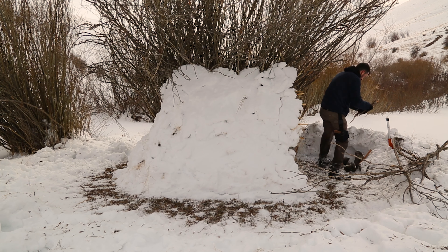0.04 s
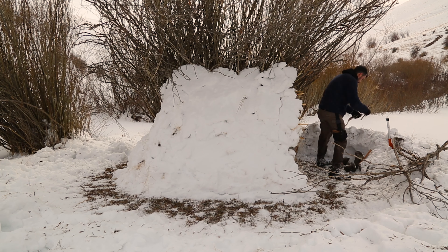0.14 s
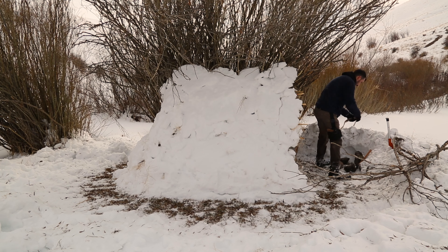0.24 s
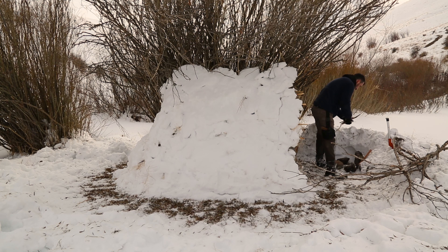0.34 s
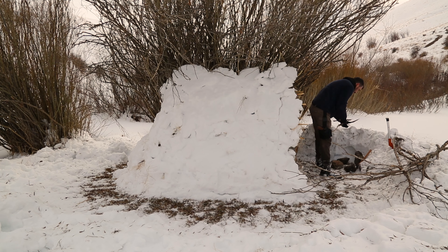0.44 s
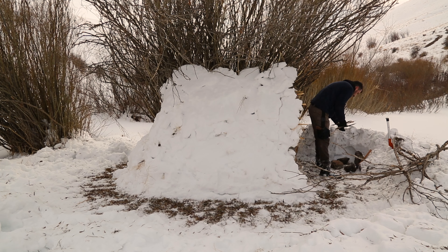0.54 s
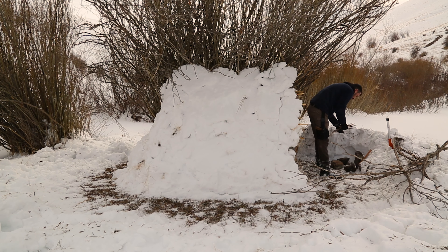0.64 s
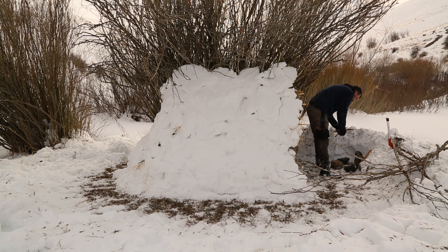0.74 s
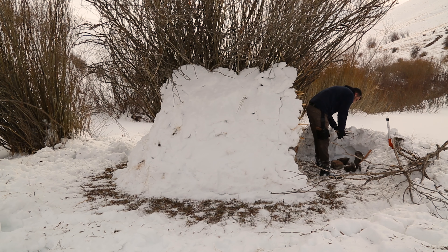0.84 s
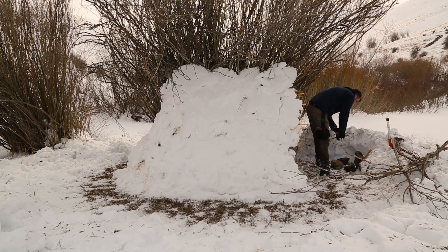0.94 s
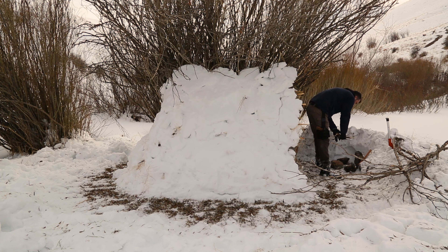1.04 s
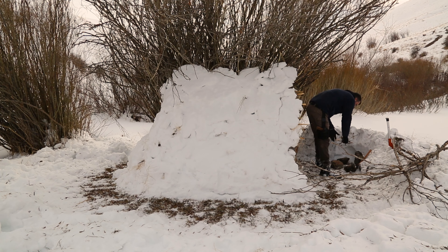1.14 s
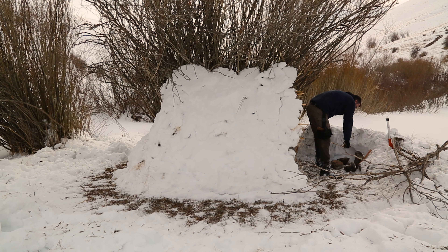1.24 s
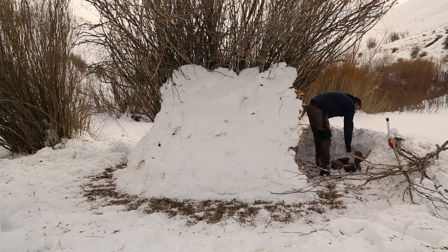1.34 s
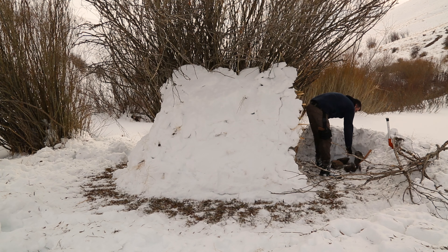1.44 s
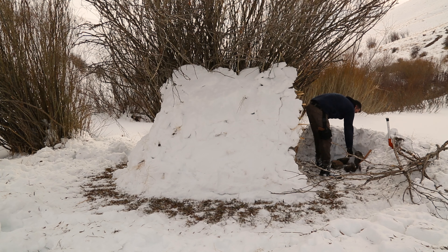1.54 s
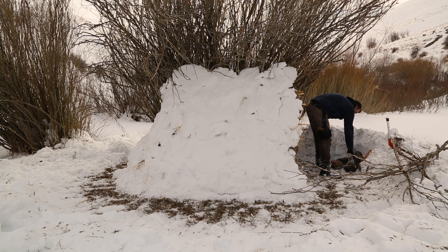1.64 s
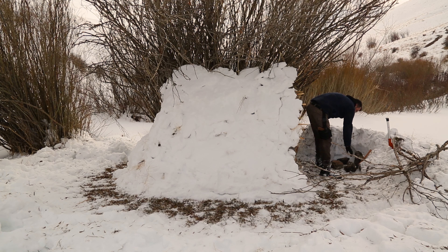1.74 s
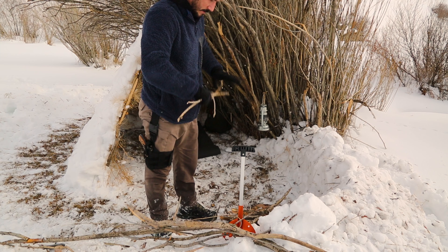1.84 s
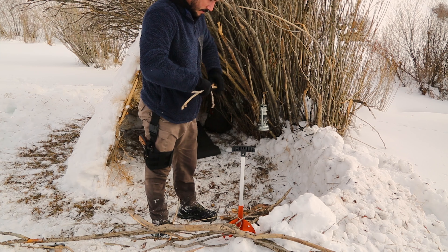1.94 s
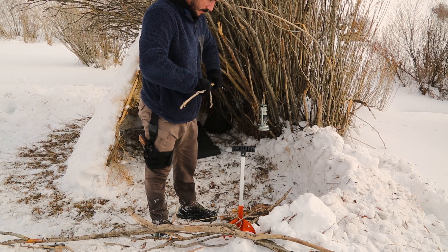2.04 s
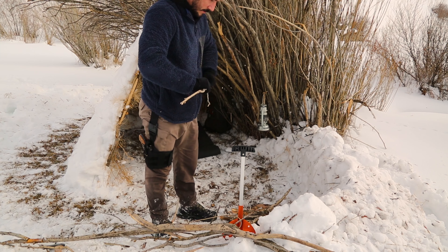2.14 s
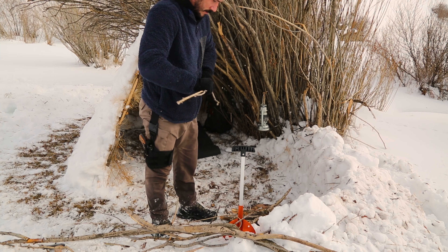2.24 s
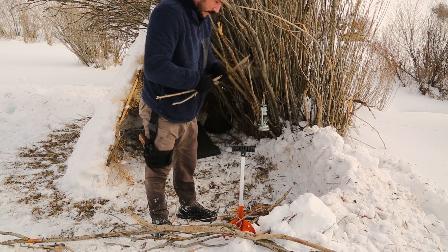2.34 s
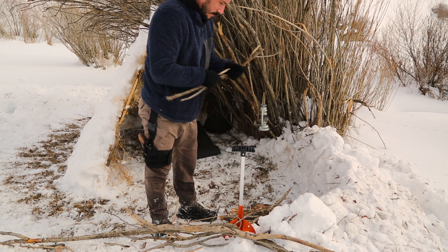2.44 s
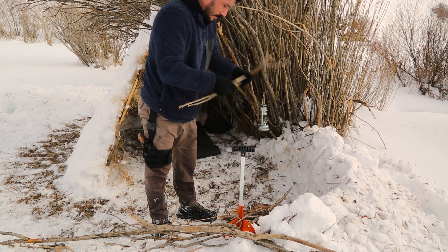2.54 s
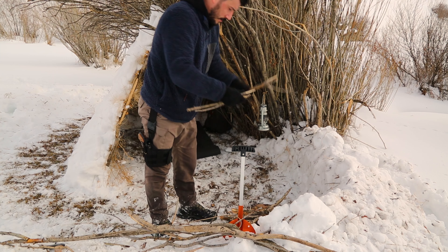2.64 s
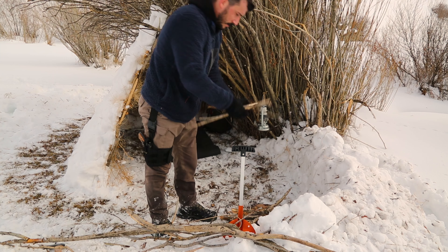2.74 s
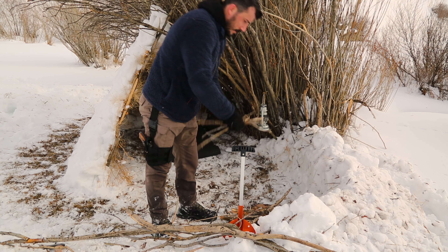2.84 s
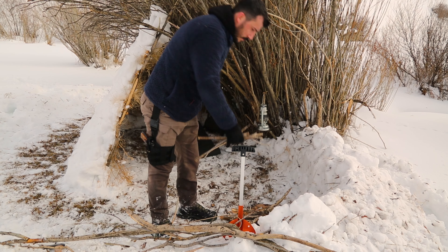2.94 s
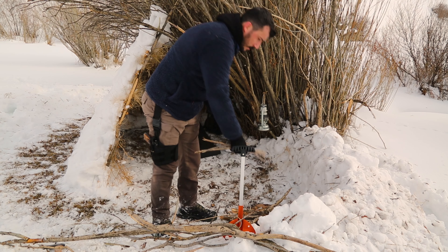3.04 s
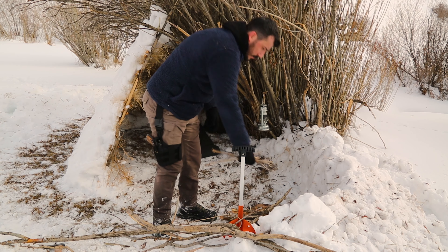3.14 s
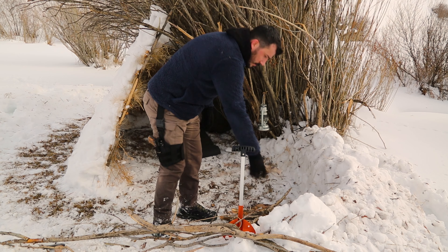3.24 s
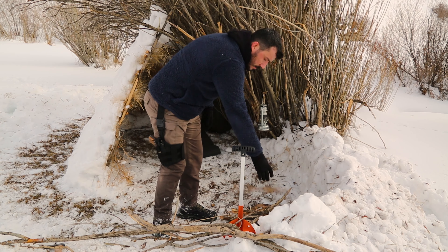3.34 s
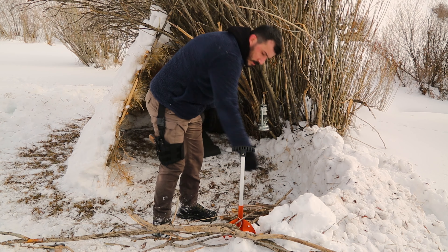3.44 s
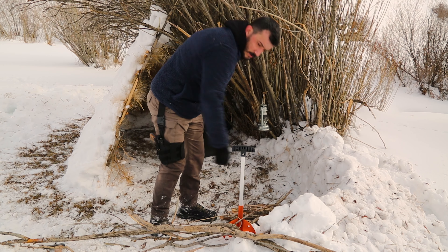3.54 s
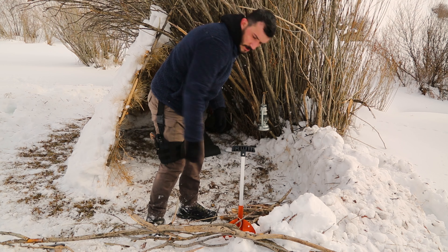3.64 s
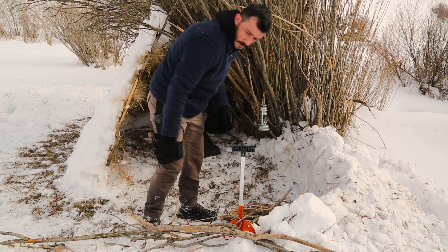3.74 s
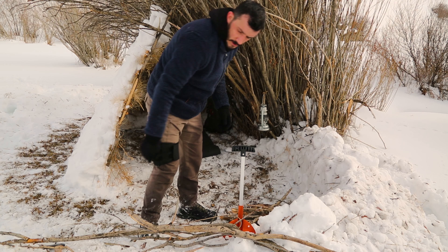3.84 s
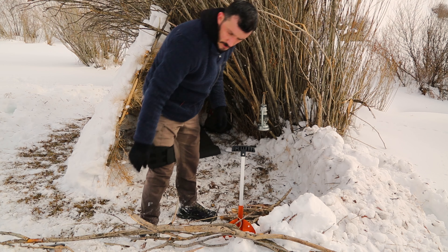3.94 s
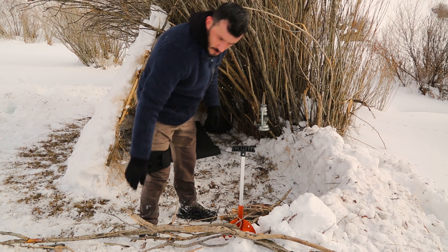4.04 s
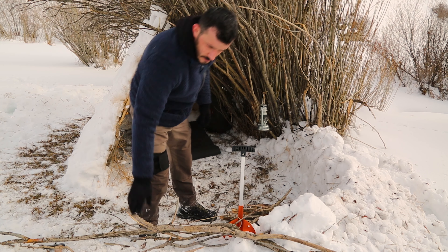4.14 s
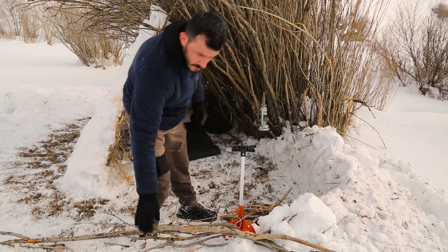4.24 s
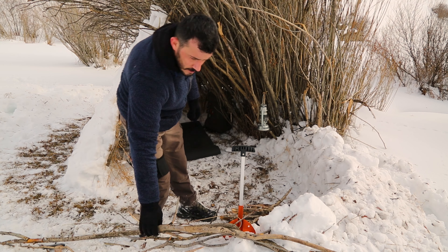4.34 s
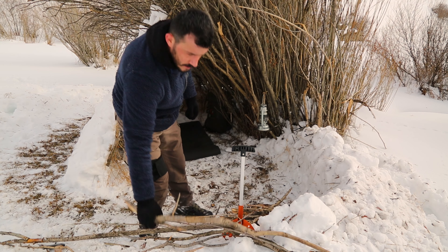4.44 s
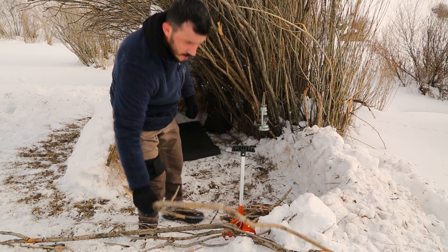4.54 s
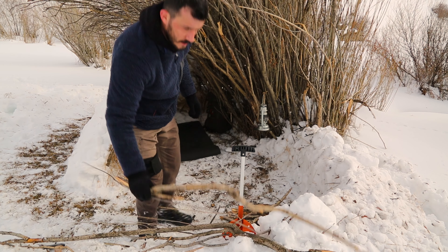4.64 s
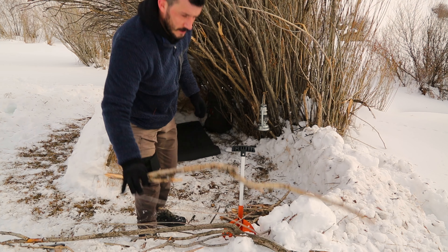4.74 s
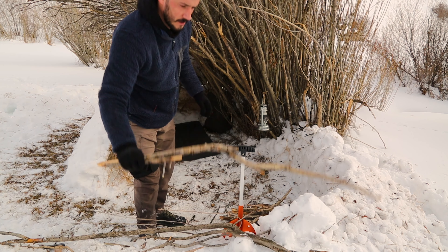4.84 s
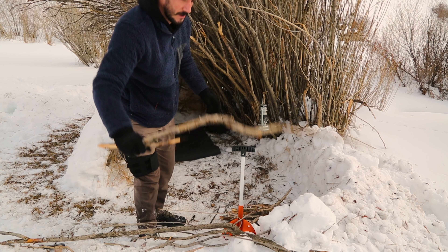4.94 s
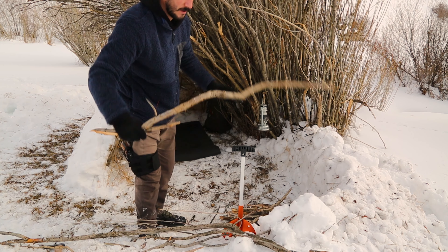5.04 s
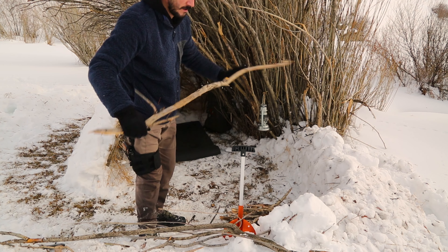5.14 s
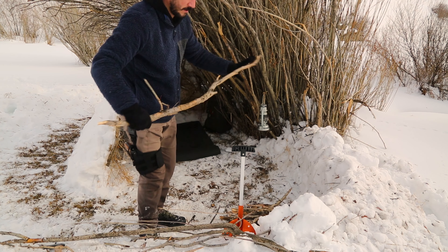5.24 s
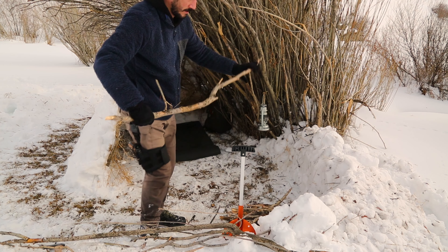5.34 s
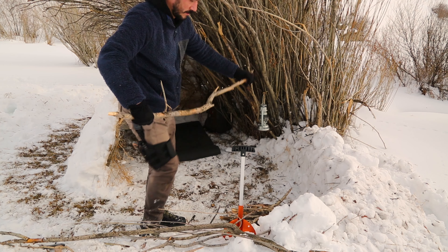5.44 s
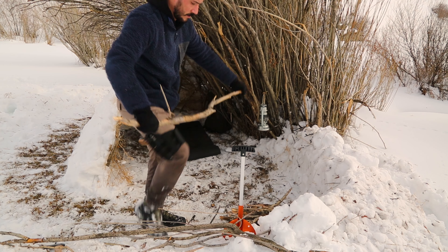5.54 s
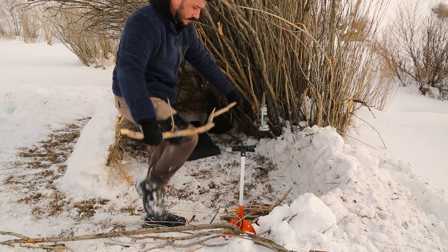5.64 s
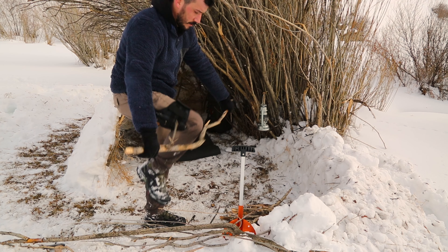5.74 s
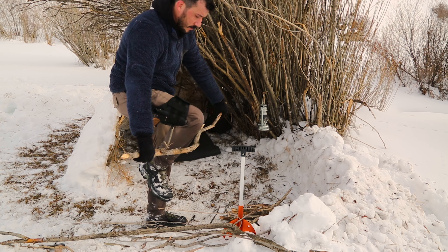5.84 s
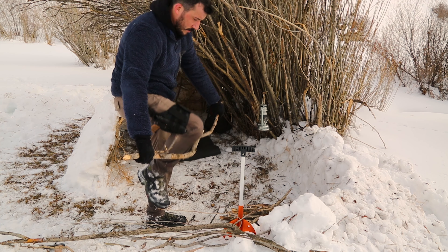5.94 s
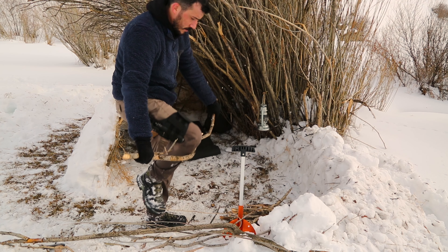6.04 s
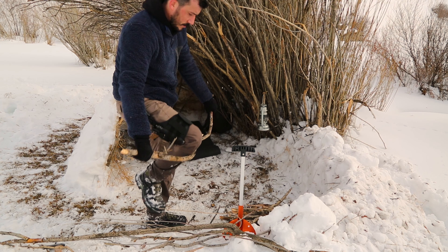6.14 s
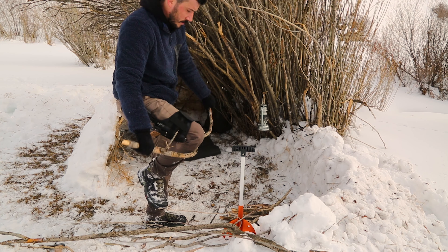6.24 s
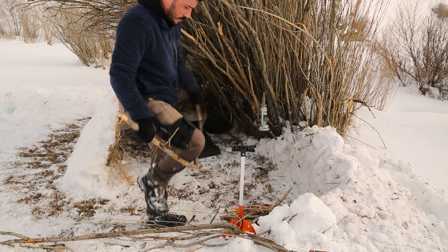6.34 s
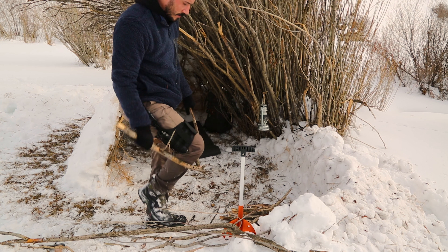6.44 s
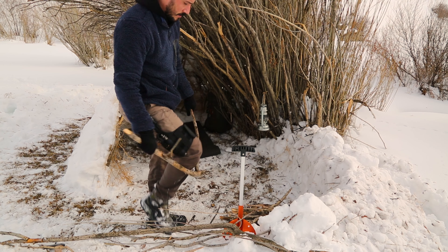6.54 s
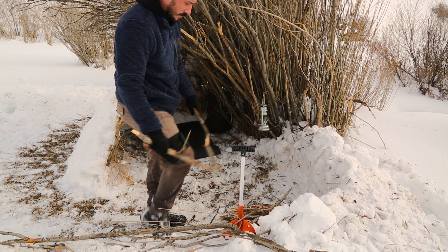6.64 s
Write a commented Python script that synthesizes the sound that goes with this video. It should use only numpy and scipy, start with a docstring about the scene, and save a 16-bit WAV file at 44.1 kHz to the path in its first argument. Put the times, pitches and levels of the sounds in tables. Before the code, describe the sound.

Dry sticks tick, knock and snap sharply in a quiet snowy camp, with faint rustling and one overloading crack near the end.

```python
"""Snapping sticks in a snowy camp

Dry sticks are picked up, knocked together and snapped in a quiet snowy camp.
Each crack is a burst of tiny clicks, the breaking fibres, filtered by the ringing stick.
Grains of noise make the rustle of twigs, snow and cloth between the cracks.
Behind them are a faint outdoor hush, a far hum, one soft whistle and a thin high tone;
the biggest snap overloads the recorder.
"""
import sys
import numpy as np
from scipy import signal
from scipy.fft import rfft, irfft
from scipy.io import wavfile
from scipy.ndimage import uniform_filter1d

SR = 44100
rng = np.random.default_rng(int(sys.argv[2]) if len(sys.argv) > 2 else 0)


def store_wav(level_fs):
    """Save 16-bit WAV to argv[1]."""
    pcm = np.round(np.clip(np.atleast_2d(level_fs), -1, 1) * 32767)
    wavfile.write(sys.argv[1], SR, pcm.T.astype(np.int16))


N = 295029  # length of the scene in samples

# Colour of the open air and microphone hiss.
# Each row: pitch in Hz, relative level in dB per Hz.
HUSH_COLOUR = [(18, -74), (30, -49), (116, -26), (200, -11), (240, -16), (304, -8), (374, -7), (538, -8),
               (698, -9.5), (881, -10), (1690, -13), (2250, -16), (15000, -24.5)]

# Moves that rub twigs, cloth and snow.
# Each row: loudest moment in seconds, length in seconds, level in dB, treble slope in dB per octave.
RUB_MOVES = [(0.0, 0.19, -61, 0), (0.479, 0.19, -57, -13), (0.89, 0.11, -63, -10),
             (1.84, 0.16, -61.5, -5.5), (2.06, 0.19, -64, -8), (2.938, 0.12, -70, -13),
             (3.559, 0.11, -58.5, -8), (3.847, 0.31, -65.5, -6), (4.061, 0.22, -63, -3.5),
             (4.33, .12, -68, -11), (4.56, 0.29, -61.5, -7), (4.71, 0.096, -59.5, -9),
             (4.805, 0.06, -51, -10), (5.059, 0.11, -63, -5), (5.196, 0.1, -60.5, -11),
             (5.502, 0.66, -65.5, -9.5), (5.946, .08, -55.5, -7), (6.002, 0.047, -54.5, -12),
             (6.141, 0.095, -51, -6.5), (6.196, 0.056, -46, -1), (6.328, 0.1, -54.5, 0.5),
             (6.69, 0.11, -52.5, -6)]

# Cracks and ticks of wood.
# Each row: start in seconds, approximate peak in dB, ring pitch in Hz, treble slope in dB per octave,
# tearing time in ms, ring strength in dB.
CRACKS = [(0.02, -40.5, 6800, -21, 4.6, 0), (0.1065, -49, 5340, -3, 3.7, 2),
          (0.832, -41.5, 1950, -3, 2.4, 1), (0.8749, -38.5, 6170, -23, 3.7, 3),
          (1.2251, -32.5, 1490, -4, 2.2, -15), (1.775, -39.5, 2100, -10.5, 2.7, -2.5),
          (1.823, -42, 1320, -5.5, 2.2, -1), (1.8528, -41.5, 1450, -7, 2.1, -6),
          (1.867, -42.5, 1540, -9, 2.3, 1), (1.881, -43.5, 3800, -19, 3.1, -2),
          (1.9109, -38.5, 7160, -15, 3.9, -16), (1.927, -43, 1336, -4, 3.4, 3),
          (2.035, -39, 4900, -7, 1.6, -8), (2.0553, -42.5, 3000, -6, 2, -1.5),
          (2.151, -39.5, 4180, -3.5, 2.7, -10), (2.164, -42, 4940, 1, 2.1, 3),
          (2.1963, -45.5, 4670, -4, 3.2, -1), (2.282, -42.5, 3640, -9, 1.2, -6),
          (2.329, -41, 6030, 0, 1.8, -5), (2.3589, -0.5, 2920, -2.5, 2.3, 0.5),
          (2.36, -21.5, 1100, -9, 2.5, -2.5), (2.3672, -5, 3140, 0, 1.6, -7),
          (2.3754, -4.5, 3580, -5, 1.8, -2), (2.384, -14, 8350, -7, 1.1, -7.5),
          (2.387, -31, 1500, 2, 6, -9), (2.4454, -31, 5930, 4.5, 1.4, -12), (2.494, -43, 5280, 7, 2.7, 6),
          (2.85, -46.5, 4880, -2, 2.3, -5), (2.9091, -41.5, 3410, -8, 3.8, 10),
          (2.9576, -45, 1055, -8, 3.2, -1), (3.502, -42, 2896, -4, 4.4, 1.5),
          (3.5092, -25, 1616, -11, 5.3, 0), (3.518, -29.5, 1600, -6, 8.1, 0),
          (3.53, -28.5, 2850, -12, 4.2, -1), (3.5366, -24.5, 3600, -13, 4.9, 10),
          (3.547, -35.5, 2480, -4, 5, -9), (3.5573, -34, 3520, -9, 6.1, -4),
          (3.638, -41, 4550, -14.5, 2.6, -1), (3.743, -45.5, 2430, -10, 2.3, 4),
          (3.765, -47.5, 1760, -11, 2.1, 6), (3.9184, -48, 3750, -8, 1.9, 7),
          (4.0367, -34, 538, -5.5, 1.8, -0.5), (4.054, -38.5, 616, -9, 2.2, 1),
          (4.0686, -39, 2120, -8, 3.2, 12), (4.115, -46, 650, -6, 3.4, -4.5),
          (4.4578, -38, 5300, -6, 3.4, -1.5), (4.4784, -42.5, 7620, -6, 2.5, -1),
          (4.4945, -45.5, 2040, -8, 2.8, 0), (4.5458, -38, 3060, -8, 2.8, -1),
          (4.572, -36, 3600, -8, 3.6, -6), (4.6042, -35, 5150, -9, 2.9, -2),
          (4.6106, -39, 3470, -9, 2.1, 7), (4.6722, -19.5, 2150, 0.4, 3.8, -8),
          (4.7016, -18, 2060, 2.5, 3.5, -19), (4.712, -32.5, 1520, -2.5, 8.8, 0),
          (4.8533, -38.5, 3630, -7.5, 4.1, 2), (4.9092, -35.5, 2840, -7.5, 1.1, 0),
          (4.9914, -30, 2580, -2, 3.6, 2), (4.998, -40.5, 1515, -12.5, 3.2, 3),
          (5.0285, -31.5, 3520, 0, 3.9, 5), (5.127, -35.5, 7000, -1, 2, 1.5),
          (5.168, -38.5, 3300, -3, 2.6, -2.5), (5.1826, -36, 3600, -6, 6.5, 1),
          (5.218, -36, 7100, -7, 2.1, 0.5), (5.575, -41.5, 3470, 0.6, 3.4, 3),
          (5.5843, -43.5, 1400, -20.5, 2, -1), (5.69, -44, 3600, -3.5, 2.1, -4),
          (5.765, -50, 1900, -9, 2.2, 0), (5.795, -48, 1400, -9, 2.1, 4), (5.9517, -45, 1290, -4, 3.4, 7),
          (6.0578, -47.5, 5350, -9, 3.2, 1), (6.1158, -39, 7650, 0, 1.6, 0), (6.135, -40, 2900, -9, 5, 6),
          (6.1702, -12, 2150, -6, 2.6, -10), (6.182, -24.5, 1970, -2, 6.5, -11),
          (6.1962, -17, 2500, -4, 2, -8), (6.215, -32, 2740, -5, 2.9, -8), (6.263, -45, 7280, -13, 2.3, 0),
          (6.2852, -41, 6120, -6, 2.3, -2), (6.2913, -40, 5340, -6, 2.3, -2.5),
          (6.303, -43, 2930, -2, 2.3, 2), (6.3228, -27.5, 3030, -8, 2.3, -2),
          (6.347, -6.5, 2130, -7.5, 2.7, -22), (6.36, -8, 2230, -6, 1.2, -14),
          (6.373, -18.5, 2800, -6, 4.7, -0.5), (6.3811, 9, 2385, -5.5, 2.87, 0.5),
          (6.3851, 4.5, 2504, -3.5, 4.2, -13.5), (6.3984, -3, 3040, -2.5, 1.1, -4.5),
          (6.4078, -4, 3040, -1.5, 0.9, -8.5), (6.416, -42, 3360, -3, 2.3, 8),
          (6.431, -23, 3700, -8, 2.3, -5), (6.4387, -30, 8000, 0.5, 1.15, -6),
          (6.4426, -32, 2290, -3, 2.1, 7), (6.463, -31, 4660, -11, 4.2, -5),
          (6.4681, -31, 657, -4.5, 3.9, 0.5), (6.49, -34, 3080, -10, 1.6, 6),
          (6.519, -42.5, 1860, -3, 2.7, 2.5), (6.6642, -40, 3044, -6, 1.6, 2.5)]

# Ways in which a stick rings.
# Each row: multiple of the ring pitch, width as a share of the mode's pitch,
# level in dB before the ring strength is added.
STICK_MODES = [(.44, .12, -10.5), (1.0, 0.055, 5), (1.33, .08, 0.5), (2.2, .07, -6.5), (2.9, .06, -7.5)]

HUSH_DB = -62
HUM_HZ, HUM_WIDTH_HZ, HUM_DB, HUM_SWELL_DB, HUM_UNTIL_S = 300, 30, -74.5, 2, 4.77
WHINE_HZ, WHINE_DB, WHINE_FROM_S = 15696, -71.5, 1.915
WHISTLE_DB, WHISTLE_FLUTTER_HZ = -75, 43.0
WHISTLE_FROM_S, WHISTLE_TO_S, WHISTLE_FROM_HZ, WHISTLE_TO_HZ = 0.73, 0.92, 3820, 4030
RUB_ENDS_DB, RUB_RISE_SHARE = -11, 0.53  # level at the ends of a move; share of its length spent rising
# Debris level is relative to the crack's peak
DEBRIS_DB, DEBRIS_FADE_DB_PER_S, DEBRIS_SLOPE_DB_PER_OCTAVE = -42, 150.5, -3
AFTER_DB, AFTER_DB_PER_MS = -17, 2.5  # crackle of splinters, stronger after a long tear
DUCK_FROM_DB, DUCK_SHARE = -11.5, 0.5  # the gain drops by this share of the excess level
HELD_LEVEL_FALL_DB_PER_S = 12
EDGE_HZ = 15900  # upper band limit


def gain_of(db):
    """Turn decibels into a factor for the wave."""
    return 10 ** (np.asarray(db) / 20)


def evened(x):
    """Scale a signal to an average (rms) strength of one."""
    return x / np.sqrt(np.mean(x ** 2) + 1e-20)


def fibres(size, per_s, spread_db):
    """Tiny clicks of random sign and size, a few of them large, like fibres or grains giving way."""
    chance = rng.random(size)
    sign = rng.standard_normal(size)
    big = rng.exponential(1, size)
    return (chance < per_s / SR) * sign * gain_of(spread_db * np.minimum(big, 4))


def hush():
    """Steady hiss; the low air noise murmurs in narrow, wandering patches."""
    frames, hz = N // 256 + 5, np.fft.rfftfreq(1024, 1 / SR)
    real, imaginary, patches = rng.standard_normal((frames, 513, 3)).T
    patches = uniform_filter1d(patches, size=3, axis=0)  # across pitch
    patches = evened(uniform_filter1d(patches, size=22, axis=1))  # across time
    table_hz, table_db = np.transpose(HUSH_COLOUR)
    colour_db = np.interp(np.log(hz + 1), np.log(table_hz), table_db)
    patch_depth_db = 3.5 / (1 + (hz / 1000.0) ** 2)
    level_db = colour_db[:, None] + patch_depth_db[:, None] * patches
    spectrum = (real + 1j * imaginary) * gain_of(level_db)
    noise = signal.istft(spectrum, nperseg=1024, noverlap=768)[1][:N]
    return gain_of(HUSH_DB) * evened(noise)


def hum():
    """A faint far hum: noise through one narrow resonance, wavering until it dies away."""
    r = np.exp(-np.pi * HUM_WIDTH_HZ / SR)
    resonance = [1, -2 * r * np.cos(2 * np.pi * HUM_HZ / SR), r * r]
    ring = signal.lfilter([1, 0, -1], resonance, rng.standard_normal(N))
    swell = uniform_filter1d(rng.standard_normal(N), size=7000)
    swell = evened(uniform_filter1d(swell, size=7000))
    fade = np.clip((HUM_UNTIL_S - np.arange(N) / SR) / 0.29, 0, 1)
    return evened(ring) * gain_of(HUM_DB + HUM_SWELL_DB * swell) * fade


def whine():
    """A thin electronic tone of the recorder: a steady, very high sine that starts abruptly."""
    t = np.arange(N) / SR
    tone = np.sqrt(2) * np.sin(2 * np.pi * WHINE_HZ * t)
    return gain_of(WHINE_DB) * tone * (t > WHINE_FROM_S)


def whistle():
    """A soft rising tone whose pitch flutters slightly at random."""
    t = np.arange(N) / SR
    flutter = evened(uniform_filter1d(rng.standard_normal(N), size=300))
    fade = np.clip(np.minimum(t - WHISTLE_FROM_S, WHISTLE_TO_S - t) / 0.02, 0, 1)
    glide_hz = np.interp(t, [WHISTLE_FROM_S, WHISTLE_TO_S], [WHISTLE_FROM_HZ, WHISTLE_TO_HZ])
    turns = np.cumsum(glide_hz + WHISTLE_FLUTTER_HZ * flutter) / SR
    return fade * gain_of(WHISTLE_DB) * np.sqrt(2) * np.sin(2 * np.pi * turns)


def rub_power(hz, slope_db, level_db):
    """Power over pitch and time of rubbing grains with one treble slope."""
    bass_cut = (hz / (hz + 200.0)) ** 4
    treble = gain_of(slope_db * np.log2(np.hypot(hz, 2000.0)))
    colour = (bass_cut * treble) ** 2
    return np.outer(colour / colour.mean(), gain_of(level_db) ** 2)


def rustle():
    """Dense grains swell and fade with each move; sparser bark and snow patter after every crack."""
    dense = evened(fibres(size=N, per_s=9600.0, spread_db=2.0))
    sparse = evened(fibres(size=N, per_s=5000.0, spread_db=2.0))
    hz, t, dense_spectrum = signal.stft(dense, SR, nperseg=256, noverlap=192)
    sparse_spectrum = signal.stft(sparse, SR, nperseg=256, noverlap=192)[2]
    moves = 0
    for s, length, level_db, slope_db in RUB_MOVES:
        side_share = np.where(t < s, RUB_RISE_SHARE, 1 - RUB_RISE_SHARE)
        along = (t - s) / (length * side_share)  # -1 and 1 at the ends of the move
        moves = moves + rub_power(hz, slope_db, level_db + RUB_ENDS_DB * along ** 2)
    fading = 0
    for s, peak_db, *_ in CRACKS:
        fading = fading + gain_of(peak_db - DEBRIS_FADE_DB_PER_S * abs(t - s)) ** 2 * (t > s)
    debris = rub_power(hz, DEBRIS_SLOPE_DB_PER_OCTAVE, DEBRIS_DB) * fading
    spectrum = dense_spectrum * np.sqrt(moves) + sparse_spectrum * np.sqrt(debris)
    return signal.istft(spectrum, SR, nperseg=256, noverlap=192)[1][:N]


def stick_colour(hz, ring_hz, slope_db, ring_db):
    """How a stick shapes its clicks: little below the ring, modes on it, sloping treble above it."""
    u = 1j * hz / ring_hz
    v = u / 0.74
    broad = (v ** 2 / (1 + 1.427 * v + v ** 2)) ** 2  # a thin stick radiates poorly below its ring
    modes = 0
    for multiple, width, db in STICK_MODES:
        x = u / multiple
        modes = modes + gain_of(db) * width * x / (1 + width * x + x ** 2)
    treble = (1 + u) ** (slope_db / 6)
    bass_cut = (hz / (hz - 200.0 * 1j)) ** 2
    push = gain_of(-27.0) / (1 + u / 0.39) ** 2 * bass_cut  # the air pushed by the recoil
    air_and_mic = 1 / (1 + 1j * hz / 22000.0) ** 2  # air and microphone soften the highest treble
    return ((broad + gain_of(ring_db) * modes) * treble + push) * air_and_mic


def crack(peak_db, ring_hz, slope_db, tear_ms, ring_db):
    """Fibres give way while the break tears, then splinters and nearby brush crackle on."""
    t = np.arange(4096) / SR
    tear_s = max(tear_ms, 0.2) / 1000
    burst = (1 - np.exp(-t / 0.000045)) * np.exp(-(t / tear_s) ** 2)
    after_shape = np.exp(-(t / 0.012) ** 2.4) * (1 - np.exp(-t / 0.0052))
    after = gain_of(AFTER_DB + AFTER_DB_PER_MS * tear_ms) * after_shape
    drive = evened(fibres(size=4096, per_s=17000.0, spread_db=3.0)) * (burst + after)
    colour = stick_colour(np.fft.rfftfreq(8192, 1 / SR), ring_hz, slope_db, ring_db)
    sound = irfft(rfft(drive, 8192) * colour)[:4096]
    strongest = np.sqrt(uniform_filter1d(sound ** 2, size=60).max())  # loudest short-time rms
    return gain_of(peak_db - 6.5) * sound / strongest  # that rms sits 6.5 dB under the nominal peak


def cracks():
    """Add up the sound of every break and knock, each at its moment."""
    out = np.zeros(N + 4096)
    for s, *settings in CRACKS:
        out[round(s * SR):][:4096] += crack(*settings)
    return out[:N]


def scene():
    """Mix all the sounds into one channel."""
    background = hush() + hum() + whine() + whistle()
    return (background + rustle() + cracks())[None]


def record(dry):
    """Overload clips the wave, gain control dips after loud breaks, and a filter cuts the top."""
    clipped = np.clip(dry, -1, 1)
    power_db = 10 * np.log10(abs(uniform_filter1d(clipped[0] ** 2, size=400)) + 1e-12)
    fall_db = np.arange(N) * HELD_LEVEL_FALL_DB_PER_S / SR
    held_db = np.maximum.accumulate(power_db + fall_db) - fall_db  # peaks held, sinking steadily
    over_db = np.maximum(held_db - DUCK_FROM_DB, 0)
    late_db = uniform_filter1d(np.pad(over_db, (2000, 0))[:N], size=1500)  # delayed and smoothed
    ducked = clipped / gain_of(DUCK_SHARE * late_db)
    band_limit = signal.firwin(1023, EDGE_HZ, window=("kaiser", 9), fs=SR)
    return signal.oaconvolve(ducked, band_limit[None], "same")


dry = scene()
out = record(dry)
store_wav(out)
```